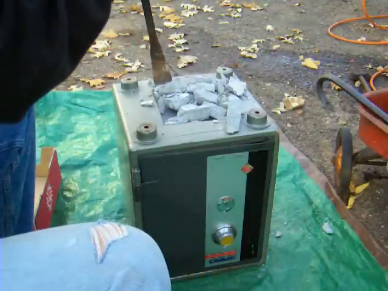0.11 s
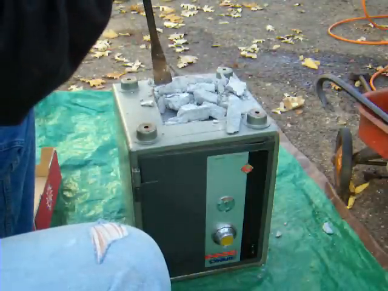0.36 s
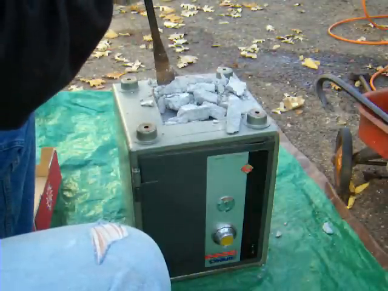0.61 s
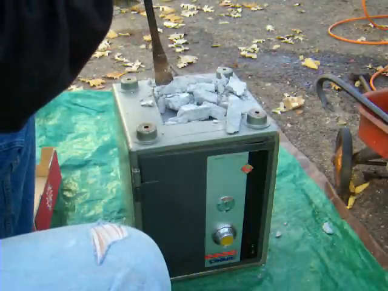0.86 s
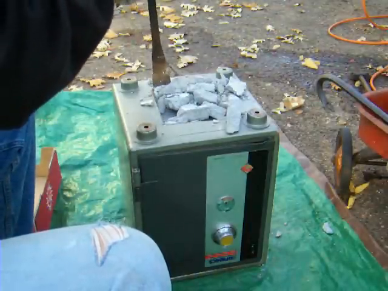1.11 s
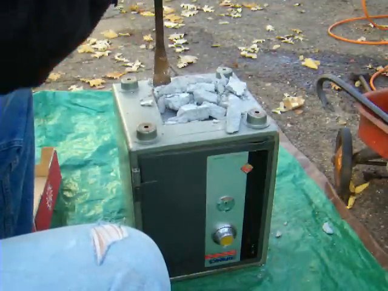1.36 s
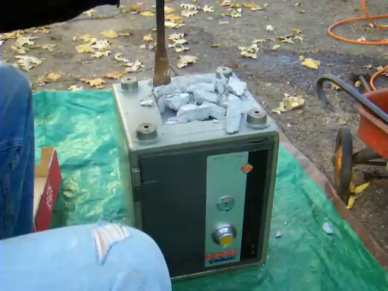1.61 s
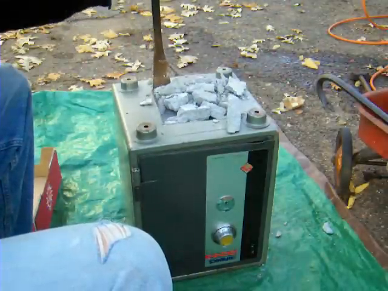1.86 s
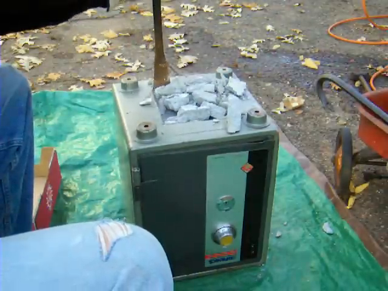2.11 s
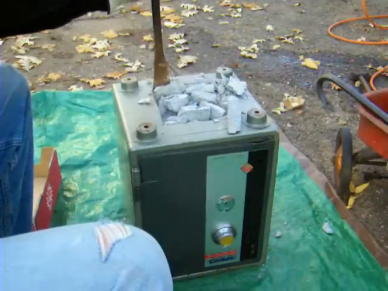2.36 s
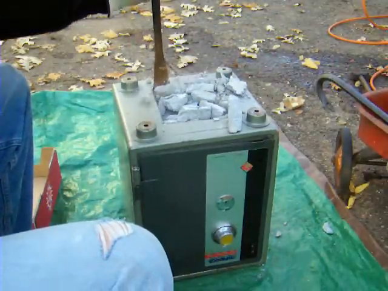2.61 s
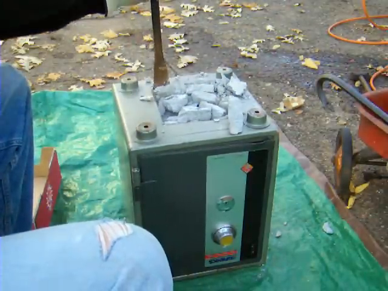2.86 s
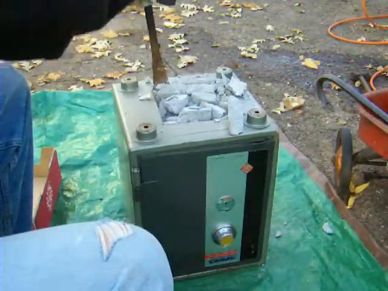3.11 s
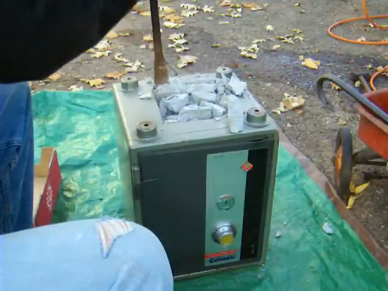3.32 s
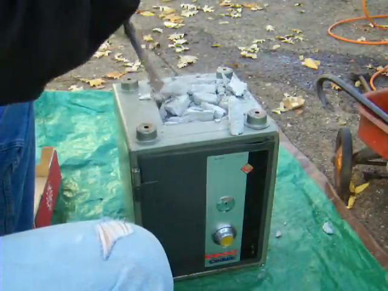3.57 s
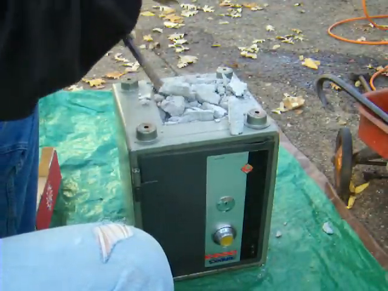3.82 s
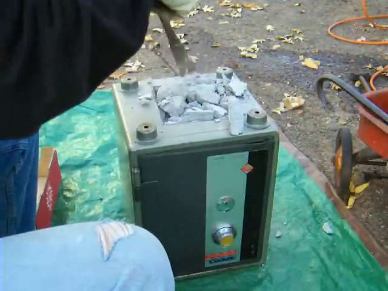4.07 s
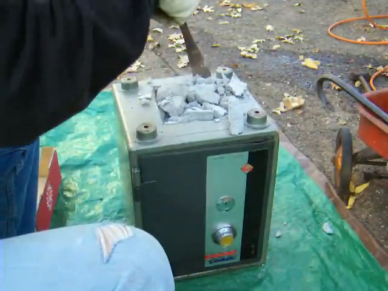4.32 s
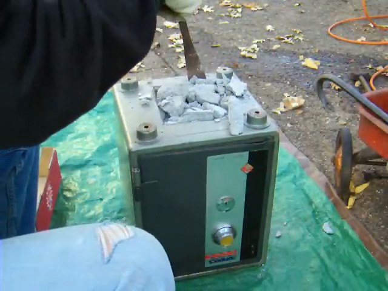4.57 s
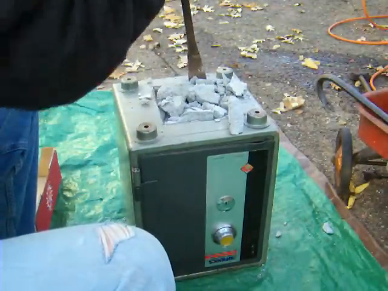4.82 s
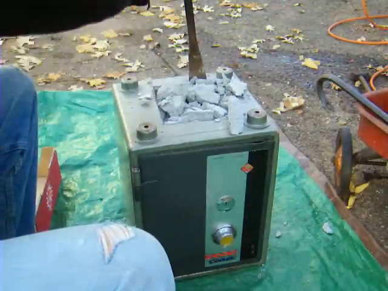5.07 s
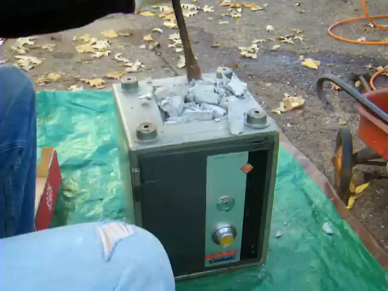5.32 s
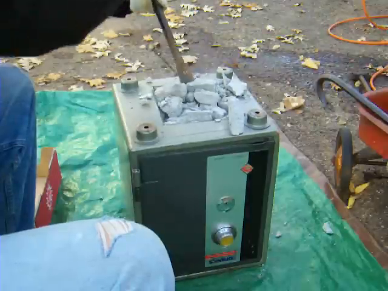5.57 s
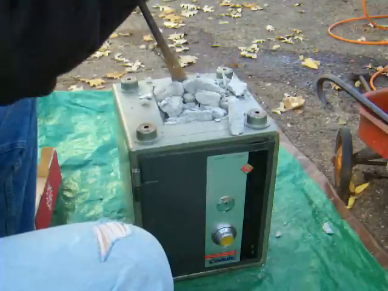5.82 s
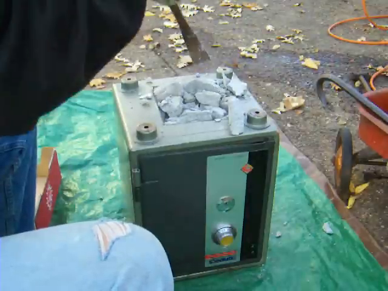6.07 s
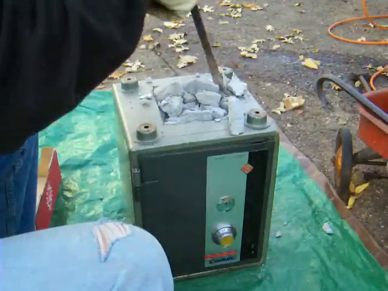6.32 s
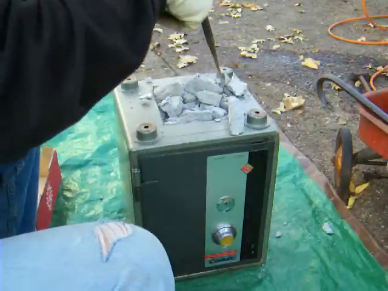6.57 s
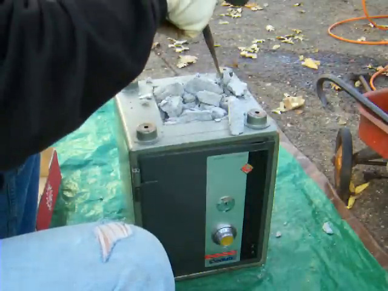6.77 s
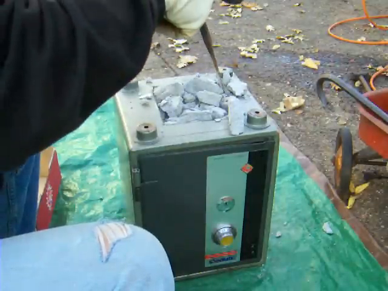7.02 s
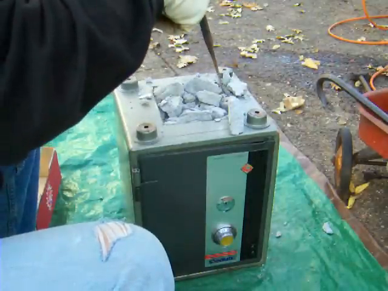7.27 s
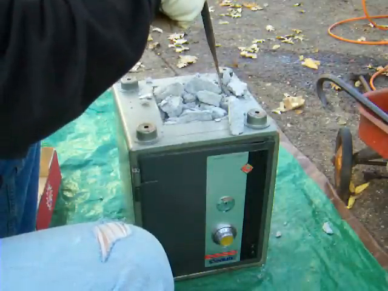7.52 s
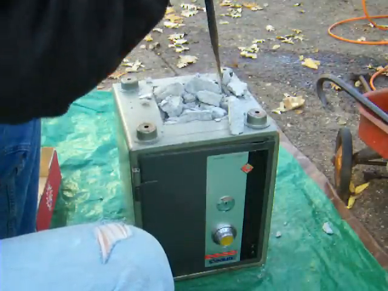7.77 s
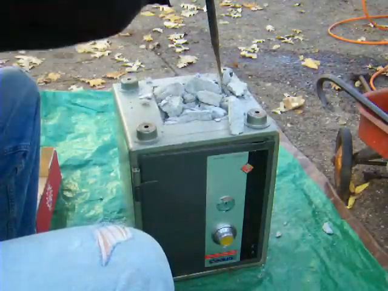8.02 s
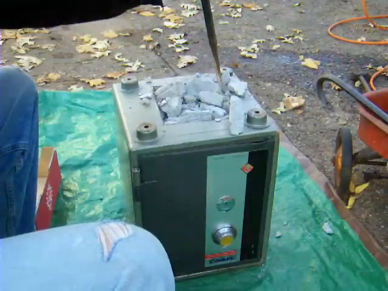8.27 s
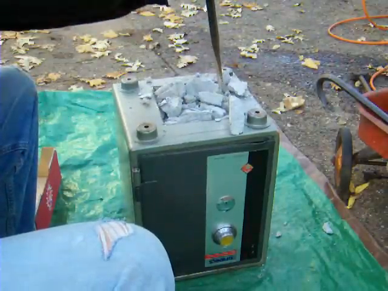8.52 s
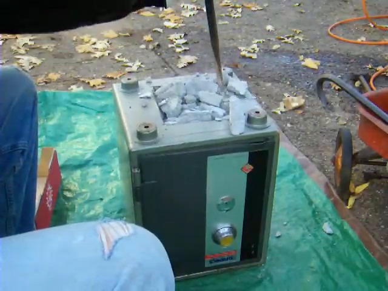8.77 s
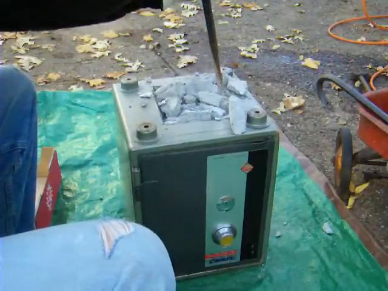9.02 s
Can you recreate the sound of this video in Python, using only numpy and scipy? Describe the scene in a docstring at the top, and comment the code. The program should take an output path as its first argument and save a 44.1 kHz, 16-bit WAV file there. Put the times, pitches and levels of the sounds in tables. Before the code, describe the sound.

A hammer cracks on a steel chisel in ringing bursts over a hollow safe, with chip scrapes, yard echoes, sparrow chirps and distant traffic.

```python
"""In a walled yard outdoors, close by, a hammer drives a steel chisel into the hard filling of a steel safe.
Blows are short cracks of noise, ringing steel modes and a thud through the box; the loudest peaks clip.
The freed chisel clanks on steel once; between blows it taps, clinks and scrapes in noise bursts and rings.
A sparrow chirps in gliding sine tones, a farther bird whistles, and far traffic rumbles as shaped noise.
Echoes from the walls are decaying noise, drawn anew for every blow and for the clank."""
import sys
import numpy as np
from scipy import signal
from scipy.fft import rfft, irfft, next_fast_len
from scipy.io import wavfile
from scipy.ndimage import map_coordinates

SR = 44100
rng = np.random.default_rng(int(sys.argv[2]) if len(sys.argv) > 2 else 0)


def natural_amplitude(level_db):
    """Convert a level in decibels to a linear amplitude factor, elementwise."""
    exponent = np.asarray(level_db, float) / 20
    return 10 ** exponent


def inscribe(sig):
    """Save sig as 16-bit PCM at rate SR to the path in sys.argv[1].

    A 1-D sig is mono; a 2-D sig holds one channel per row.
    Samples are clipped to [-1, 1] before scaling.
    """
    pcm = np.round(np.clip(np.atleast_2d(sig).T, -1, 1) * 32767)
    wavfile.write(sys.argv[1], SR, pcm.astype(np.int16))


N = 403074  # length in samples


def unit(x):
    """Scales a sound to rms 1."""
    return x / np.sqrt(np.mean(x ** 2) + 1e-20)


def along(points, hz):
    """Reads a curve of (Hz, value) points on a logarithmic pitch axis, as hearing is."""
    f, v = np.transpose(points)
    return np.interp(np.log(hz + 1), np.log(f + 1), v)


def filtered(x, response):
    """Multiplies the spectrum of x by a response, a function of frequency in Hz."""
    m = next_fast_len(len(x) + 8192)
    return irfft(rfft(x, m) * response(np.fft.rfftfreq(m, 1 / SR)), m)[:len(x)]


def noise(spectrum):
    """Coloured noise of rms 1."""
    return unit(filtered(rng.standard_normal(N), lambda hz: natural_amplitude(along(spectrum, hz))))


def wobble(step):
    """A smooth random curve with one new value every step samples."""
    return map_coordinates(rng.standard_normal(int(N / step) + 4), [np.arange(N) / step])


def add(track, s, sound):
    """Lays a sound on a track at s seconds."""
    part = track[round(s * SR):][:len(sound)]
    part += sound[:len(part)]


def fall(t, t60, rise=0.00014):
    """A quick rise, then a decay by 60 dB in t60 seconds."""
    return natural_amplitude(-60 * t / t60) * (1 - np.exp(-t / rise))


def ring(modes, t, damp, scatter_db, tilt_db, rise=0.000083):
    """Struck steel: one decaying sine per mode, with random strength and phase; damp scales the decay times."""
    chance = rng.standard_normal((len(modes), 2))
    out = 0
    for (hz, db, t60, *_), (strength, phase) in zip(modes, chance):
        level = natural_amplitude(db + tilt_db(hz) + scatter_db * strength)
        out = out + level * fall(t, damp * t60, rise) * np.sin(2 * np.pi * hz * t + phase)
    return out


# Hammer blows, and at 5.18 s the freed chisel clanking on steel. Each row: start in seconds, basic level
# in dB, then the thud, the low ring and the high ring, each in dB relative to that level before shaping.
STRIKE_ROWS = [(1.7171, -4.5, -20.5, -24.5, -9), (2.115, -2, -16.5, -29, -11),
               (2.5649, -2, -25.5, -19.5, -10), (2.9747, -2.5, -17.5, -24.5, -3),
               (5.1492, -5.5, -27, -2, -3), (5.1792, -17.5, -10.5, -3, -12), (8.14, -5.5, -22, -4.5, -6.5),
               (8.545, -5, -17, -7.5, -8.5), (8.954, -5, -18, -4.5, -9)]
# Notes of the hammer head. Each row: pitch in Hz, strength in dB, decay time (60 dB) in contact in seconds
# before damping scales it, strength in dB of the free ring afterwards.
HAMMER_MODES = [(2320, 1, .007, -40), (4290, 2, .025, -2), (4380, 4, .025, -1), (5985, 5, .032, 0),
                (6180, -3, .025, -7), (6390, 0, .035, -6), (8750, -14, .03, -14)]
# Bending notes of the chisel. Each row: pitch in Hz, strength in dB, decay time in seconds before damping.
CHISEL_MODES = [(4490, -4, .18), (4810, -12, .08), (6110, -2, .12), (7180, -7, .11), (7930, -5, .12),
                (9900, -3, .1)]
# Colour of the steel-on-steel crack. Each row: frequency in Hz, strength in dB per Hz.
CRACK_COLOUR = [(410, -35), (700, -5.5), (2180, -1.5), (3520, -12), (4450, 1), (5190, -9), (10100, -11),
                (11500, -9), (15000, -53.5), (22000, -120)]
# A second contact follows, weaker the more the steel rings (dB per dB of ring).
REBOUND_S, REBOUND_DB, REBOUND_PER_RING = 0.0097, -20, -0.2
RATTLE_S, RATTLE_DB = 0.005, -7  # the chisel rattles this long after each landing
SING_HZ, SING_DB = 5930, 12  # a glancing rebound favours this pitch, at most this much where the high ring leads


def strikes():
    """Crack, ringing steel and a thud through the box; after a blow the head bounces back onto the chisel.

    The clank of the freed chisel is built from the same contacts."""
    steel, push, crack, t = np.zeros(N), np.zeros(N), np.zeros(N), np.arange(SR // 8) / SR
    for s, db, thud_db, low_db, high_db in STRIKE_ROWS:
        rebound = db + REBOUND_DB + REBOUND_PER_RING * (low_db + high_db)
        rattle = rebound + RATTLE_DB
        tilt = [0, low_db, low_db, high_db, high_db, (low_db + high_db) / 2, -2]
        where = lambda hz: np.interp(hz, [2400, 4300, 4500, 6000, 6200, 6400, 8000], tilt)
        glancing = np.clip((high_db - low_db) / 10, 0, 1)
        # the lowest mode speaks first
        add(steel, s, natural_amplitude(db - 2.0) * ring(HAMMER_MODES[:1], t, 1.0, 2.0, where))
        # contacts: delay in seconds, level in dB, rise in seconds, damping factor, singing in dB
        contacts = ((.0006, db + 1.0, .0005, 0.4, 0),
                    (REBOUND_S, rebound, .0015, .8, SING_DB),
                    (RATTLE_S, rattle, .0015, .5, SING_DB),
                    (REBOUND_S + RATTLE_S, rattle, .0015, .5, SING_DB))
        for delay, level, rise, damp, sing_db in contacts:
            bump = lambda hz: np.exp(-((hz - SING_HZ) / 150) ** 2) - .4
            favoured = lambda hz: where(hz) + sing_db * glancing * bump(hz)
            gripped = natural_amplitude(-13) * ring(CHISEL_MODES, t, .17, 2, where, rise)  # the glove damps the chisel
            head = ring(HAMMER_MODES[1:], t, damp, 0.89, favoured, rise)
            add(steel, s + delay, natural_amplitude(level - 0.5) * (gripped + head))
            if delay > .001:  # later contacts sound the lowest mode again
                add(steel, s + delay, natural_amplitude(level + 3) * ring(HAMMER_MODES[:1], t, 1.5, 4, where, rise))
            burst = natural_amplitude(level) * fall(t, 0.012, rise / 2) + natural_amplitude(level - 25) * fall(t, 0.028)
            add(crack, s + delay - .0006, burst)
        # the filling breaks unevenly
        add(push, s, natural_amplitude(db + thud_db + 19.0) * fall(t, 0.069) * rng.standard_normal(len(t)))
        push[round((s + .001) * SR)] += natural_amplitude(db + thud_db + 42)  # the strike itself reaching the box
    return steel + crack * noise(CRACK_COLOUR) + safe(push)


# Panels of the safe. Each row: pitch in Hz, width of the resonance in Hz, strength in dB.
SAFE_PANELS = [(121, 43, 3), (287, 89, 1.5), (370, 92, 1.5), (504, 110, -2), (876, 250, -12),
               (1101.4, 60, -7), (1600, 660, -17)]


def safe(force):
    """The box booms where it is pushed: each panel resonates, with alternating sign."""
    def panels(f):
        total = 0
        for k, (centre, width, db) in enumerate(SAFE_PANELS):
            drag = 1j * f * width
            total = total + (-1) ** k * natural_amplitude(db) * drag / (centre * centre - f * f + drag)
        return total
    return filtered(force, panels)


def waver(t, hz, size, phase):
    """One free mode that fills in late and wavers in size and phase."""
    return size * fall(t, 0.52, 0.02) * np.sin(2 * np.pi * hz * t + phase)


# Offsets in dB: free ring under the struck ring (low, high), panel boom over the thud.
FREE_LOW_DB, FREE_HIGH_DB, BOOM_DB = -32.5, -32, -4.5
# The chisel breaks through and the box jolts on the ground.
ROCK_S, ROCK_HZ, ROCK_DB, ROCK_T60_S = 5.182, 90, -18, .09


def linger():
    """Steel rings on after each strike, its lines fluttering among the walls; the largest panel booms."""
    out, t = np.zeros(N), np.arange(SR // 2) / SR
    for s, db, thud_db, low_db, high_db in STRIKE_ROWS:
        for hz, _, _, free_db in HAMMER_MODES:
            level = db + (low_db + FREE_LOW_DB if hz < 5000 else high_db + FREE_HIGH_DB)
            if hz > 6300:  # the top modes lean towards the low ring
                level = level + (low_db - high_db) / 4
            knots = rng.standard_normal((2, 140))  # 240 random values a second
            flutter, drift = (map_coordinates(k, [t * 240]) for k in knots)
            add(out, s, natural_amplitude(level + free_db) * waver(t, hz, 1 + .8 * flutter, drift))
        boom = fall(t, .12, .007) * np.sin(2 * np.pi * 105 * t)
        add(out, s, natural_amplitude(db + thud_db + BOOM_DB) * boom)
    jolt = fall(t, ROCK_T60_S, .003) * np.sin(2 * np.pi * ROCK_HZ * t)
    add(out, ROCK_S, natural_amplitude(ROCK_DB) * jolt)
    return out


# Chisel tip touching chips, and knocks through the box as the hammer rebounds. Each row: start in seconds,
# basic level in dB, knock in dB relative to it, length in seconds before the decays scale it.
TOUCH_ROWS = [(0.111, -33.5, 0.5, 0.021), (0.942, -38, 3.5, 0.017), (1.014, -44, -22, 0.017),
              (1.024, -42, 3.5, 0.031), (1.378, -41.5, -3.5, 0.018), (2.263, -40, 3, 0.018),
              (2.468, -49, -1, 0.044), (3.307, -37, 1, 0.0089), (2.981, -35.5, 13.5, 0.011),
              (3.375, -43.5, -6, 0.041), (3.582, -36.5, 1, 0.025), (3.618, -48, 10, 0.013),
              (3.64, -54, 2, 0.017), (3.545, -40, -8, 0.15), (3.612, -40.5, 2, 0.05),
              (3.753, -42.5, 7, 0.013), (4.278, -37.5, 7, 0.012), (5.188, -33, -4, 0.017),
              (5.424, -42.5, 1.5, 0.014), (5.44, -38, 6, 0.024), (5.498, -42, -24, 0.024),
              (5.536, -53, 11.5, 0.022), (5.593, -48, 8.5, 0.032), (5.719, -48.5, -5.5, 0.074),
              (5.863, -43, -2, 0.011), (5.957, -50, -6, 0.019), (6.3, -42.5, -7, 0.039),
              (6.526, -43.5, -18, 0.027), (6.673, -45, -2.5, 0.057), (6.94, -44.5, -5, 0.018),
              (7.225, -49.5, 1, 0.064), (7.313, -43.5, 3, 0.027), (8.148, -35, 10, 0.017),
              (8.173, -37.5, 3, .015), (8.553, -31.5, 14, 0.0092)]
# Chisel clinking on steel. Each row: start in seconds, basic level in dB, ring over the crunch in dB,
# brightness of the ring in dB per octave.
CLINK_ROWS = [(0.49, -55.5, -9, 9), (0.577, -52.5, -7, 2), (0.697, -42, -6.5, -0.5),
              (3.829, -44.5, -15, -18), (3.932, -49, -6, 3.5), (3.963, -45, -9, 0), (4.428, -49.5, -9.5, 6),
              (4.453, -49, -6.5, 0), (5.18, -29, 5.5, -8.5)]
# Colour of the crumbling filling. Each row: frequency in Hz, strength in dB per Hz.
GRIT_COLOUR = [(530, -43), (900, 6.5), (1580, -9), (2230, -8.5), (9800, -10.5), (10800, -39), (11500, -66),
               (15000, -98), (22000, -120)]
CLINK_T60_S = 0.079  # decay of the crunch under a clink
FIRST_TOUCH_DB = 13  # extra strength of the first contact


def taps_and_knocks():
    """A short crunch with a knock through the box; on steel, a crunch with a free ring instead.

    That ring is mostly faint, but strong in the clank at 5.18 s."""
    steel, push, crunch, t = np.zeros(N), np.zeros(N), np.zeros(N), np.arange(SR // 4) / SR
    touch = np.zeros(N)
    for s, db, knock_db, length in TOUCH_ROWS:
        add(crunch, s, natural_amplitude(db - 3.5) * fall(t, 2.2 * length, length / 40))
        add(push, s, natural_amplitude(db + knock_db + 19) * fall(t, 2.4 * length, 0.0014))
        touch[round(s * SR)] = natural_amplitude(db + knock_db + 21.0 + FIRST_TOUCH_DB)
    for s, db, ring_db, bright_db in CLINK_ROWS:
        tilt = lambda hz: bright_db * np.log2(hz / 6000)
        add(steel, s, natural_amplitude(db + ring_db) * ring(CHISEL_MODES, t, 0.74, 1.1, tilt, 0.004))
        add(crunch, s, natural_amplitude(db) * fall(t, CLINK_T60_S, 0.0049))

    def top_plate(f):  # thin and near: little bass, one clear note
        return 1j * f / (280 + 1j * f) + 1.5j * f * 200 / (1030 ** 2 - f * f + 200j * f)

    rattle = natural_amplitude(3 * wobble(70) - 1)  # chips break one after another
    knock = safe(touch + push * rattle * rng.standard_normal(N))
    steel = steel * (1 + .7 * wobble(120))  # it chatters against the rim
    return steel + crunch * rattle * noise(GRIT_COLOUR) + filtered(knock, top_plate)


# Chisel dragged through the chips. Each row: start, hardest moment and end in seconds, basic level in dB.
DRAG_ROWS = [(3.248, 3.63, 3.692, -48), (5.403, 5.528, 5.603, -50.5)]
START_DB, END_DB, HOLLOW_DB = -12, -8, 2  # start and end under the hardest moment; hollow part over the grit
TRICKLE_S = 0.064  # chips keep falling after a stroke


def drags():
    """Clumps of tiny breaks under the stroke: bright grit and a hollow part from the box."""
    grains = rng.standard_normal(N) * natural_amplitude(4 * wobble(60) + 1.2 * wobble(500))
    grit = unit(filtered(grains, lambda hz: natural_amplitude(along(GRIT_COLOUR, hz))))
    hollow = unit(filtered(safe(grains), lambda hz: hz / (250 + hz)))
    stroke, t = np.zeros(N), np.arange(N) / SR
    for start, hardest, end, db in DRAG_ROWS:
        times = (start, hardest, end, end + TRICKLE_S)
        stroke += natural_amplitude(db + np.interp(t, times, (START_DB, 0, END_DB, 2 * END_DB), -99, -99))
    bright = (stroke / stroke.max()) ** 0.46  # harder strokes are brighter
    return stroke * (bright * grit + natural_amplitude(HOLLOW_DB) * hollow)


# Loose chips: ticks per second, least level and spread before colouring, decay time.
TICKS_PER_S, TICK_DB, TICK_SPREAD_DB, TICK_T60_S = 7, -62, 2.5, .012


def settling():
    """Loose chips shift at random moments, each with a faint bright tick of noise."""
    out, t = np.zeros(N), np.arange(SR // 20) / SR
    for when, size in rng.random((round(TICKS_PER_S * N / SR), 2)):
        level = natural_amplitude(TICK_DB - TICK_SPREAD_DB * np.log(1 - size))
        add(out, when * N / SR, level * fall(t, TICK_T60_S))
    return filtered(out * noise(GRIT_COLOUR), lambda f: 1j * f / (3000 + 1j * f))


# Colour of a strike as the walls return it. Each row: frequency in Hz, strength in dB per Hz.
ECHO_COLOUR = [(88, -27.5), (150, -3), (204, -5.5), (3810, -16), (4320, -17), (8550, -21), (11000, -47),
               (14300, -73), (22000, -120)]


def shocks():
    """Each strike as one short shock that leaves for the walls."""
    out = np.zeros(N)
    for s, db, *_ in STRIKE_ROWS:
        out[round(s * SR)] = natural_amplitude(db + 14.0)
    return filtered(out, lambda hz: natural_amplitude(along(ECHO_COLOUR, hz)))


# How fast the echoes die. Each row: frequency in Hz, decay time (60 dB) in seconds.
YARD_DECAY = [(100, 0.91), (1000, 0.62), (4000, 0.73), (10000, 0.44)]
SLAP_S, SLAP_DB, SLAP_T60_S = 0.055, 4, 0.05  # one far wall answers apart, on top of the other echoes


def yard(x, rise):
    """Far walls: echoes gather over rise seconds, each frequency dies at its own speed; new ones every strike."""
    starts = np.round((np.array(STRIKE_ROWS)[1:, 0] - .01) * SR).astype(int)
    out, edges = np.zeros(N), np.r_[0, starts, N]
    for a, b in zip(edges, edges[1:]):
        hz, t, z = signal.stft(rng.standard_normal(SR), SR, nperseg=256)
        decay = natural_amplitude(-60 * t / along(YARD_DECAY, hz)[:, None])
        gather = (t / rise) ** 2 / (1 + (t / rise) ** 2)
        tail = signal.istft(z * decay * gather, SR, nperseg=256)[1]
        late = np.clip(np.arange(len(tail)) / SR - SLAP_S, 0, 1)
        tail = tail * (1 + natural_amplitude(SLAP_DB) * fall(late, SLAP_T60_S, 0.0067))
        add(out, a / SR, signal.fftconvolve(x[a:b], tail / np.linalg.norm(tail)))
    return out


# Sparrow notes. Each row: start in seconds, pitch in Hz at mid-note, fall in Hz from start to end
# (negative rises), basic level in dB.
CHIRP_ROWS = [(4.318, 4500, -200, -65), (4.428, 4650, -500, -64), (4.548, 5100, -700, -62),
              (4.688, 5050, -700, -63), (4.845, 4970, 750, -63), (5.73, 4700, 1000, -65),
              (5.835, 4890, 500, -66), (7.348, 4840, 700, -63), (7.648, 4580, -300, -63),
              (7.787, 5290, 200, -61), (7.928, 5200, 300, -62), (8.086, 5140, -100, -63),
              (8.918, 4520, -400, -62)]
# A farther bird's whistles. Each row: start in seconds, length in seconds, starting pitch in Hz,
# basic level in dB.
WHISTLE_ROWS = [(5.54, .065, 4900, -62), (6.017, .04, 4300, -67), (7.262, .035, 4000, -70)]
# A note's length, the height of its arch, and the low cluck after it.
NOTE_S, ARCH_HZ, CLUCK_HZ, CLUCK_AFTER_S, CLUCK_DB = .026, 850, 2908, .048, -6.5


def sparrow():
    """Notes arch in pitch, then a lower upward flick, a weak slide down, a cluck; a farther bird's whistles sag."""
    out, u, short = np.zeros(N), np.linspace(0, 1, round(NOTE_S * SR)), np.hanning(500)
    sing = lambda hz: np.sin(2 * np.pi * np.cumsum(hz) / SR)
    for s, top_hz, fall_hz, db in CHIRP_ROWS:
        note = top_hz - ARCH_HZ * (2 * u - 1) ** 2 - fall_hz * (u - .5)
        add(out, s, natural_amplitude(db) * np.sqrt(np.sin(np.pi * u) + 1e-9) * sing(note))
        flick = np.linspace(.85, 1, len(short)) * (top_hz - ARCH_HZ)
        add(out, s + NOTE_S + 0.0041, natural_amplitude(db - 0.5) * short * sing(flick))
        slide = np.linspace(top_hz, CLUCK_HZ, 2 * len(short))
        add(out, s + 1.5 * NOTE_S, natural_amplitude(db - 5) * np.repeat(short, 2) * sing(slide))
        cluck = np.sin(2 * np.pi * CLUCK_HZ * np.arange(len(short)) / SR)
        add(out, s + CLUCK_AFTER_S, natural_amplitude(db + CLUCK_DB) * short * cluck)
    for s, length, hz, db in WHISTLE_ROWS:
        t = np.arange(round(length * SR)) / SR
        swell = np.sqrt(np.abs(np.sin(np.pi * t / length)))
        add(out, s, natural_amplitude(db) * swell * np.sin(2 * np.pi * hz * (t - 0.22 * t * t)))
    return out * (1 + .5 * wobble(150))  # leaves scatter the far sound


# Colour of far traffic. Each row: frequency in Hz, strength in dB per Hz.
TRAFFIC_COLOUR = [(12, -47), (20, -16.5), (76, -2), (151, -10), (202, -18), (301, -22.5), (827, -27.5),
                  (1050, -27.5), (1570, -35), (4780, -44), (7720, -41.5), (10100, -51), (11500, -67),
                  (15000, -99), (22000, -120)]
TRAFFIC_DB = -48  # rms level
# A thin steady whine: pitch in Hz, width in Hz, rms level in dB.
WHINE_BAND = (7520, 18, -79)


def background():
    """Far traffic is steady coloured noise; the whine is a narrow band of noise."""
    hz, width, whine_db = WHINE_BAND
    whine = unit(filtered(rng.standard_normal(N), lambda f: 1 / (1 + ((f - hz) / width) ** 2)))
    return natural_amplitude(TRAFFIC_DB) * noise(TRAFFIC_COLOUR) + natural_amplitude(whine_db) * whine


def scene():
    """Work at the safe, its echoes and the outdoors, summed in one channel."""
    struck, small, bird = strikes(), taps_and_knocks() + drags() + settling(), sparrow()
    t = np.arange(SR // 8) / SR
    leaves = rng.standard_normal(SR // 8) * fall(t, .07, .004)  # the tree blurs the notes
    blurred = signal.fftconvolve(bird, leaves / np.linalg.norm(leaves))[:N]
    bird = bird + natural_amplitude(-4) * blurred + natural_amplitude(-17) * yard(bird, .015)
    treble = filtered(struck, lambda f: (f / (f + 3500)) ** 2 * 2)  # the bright part of the strikes
    echoes = yard(shocks() + natural_amplitude(-16.0) * small + natural_amplitude(-30.0) * treble, 0.017)
    return (struck + linger() + small + echoes + bird + background())[None]


def top_cut(x):
    """Nothing passes above the cut-off."""
    return signal.sosfilt(signal.butter(12, 16720, fs=SR, output="sos"), x)


# Band of the converter. Each row: frequency in Hz, gain in dB.
CONVERTER_BAND = [(20, 1), (10700, 2), (11400, -18.5)]
# What is left of the clipping's overtones. Each row: frequency in Hz, gain in dB.
OVERTONES_LEFT = [(10900, 0), (11500, -11.5), (16200, -17.5), (16700, -59)]


def record(dry):
    """The converter limits the band and clips peaks near 0.66; then the overtones of the clipping are cut."""
    band = filtered(dry[0], lambda hz: natural_amplitude(along(CONVERTER_BAND, hz)))
    clipped = band / (1 + np.abs(band / .66) ** 10) ** (1 / 10)
    mix = filtered(clipped, lambda hz: natural_amplitude(along(OVERTONES_LEFT, hz)))[None]
    return top_cut(mix)


dry = scene()
out = record(dry)
inscribe(out)
```